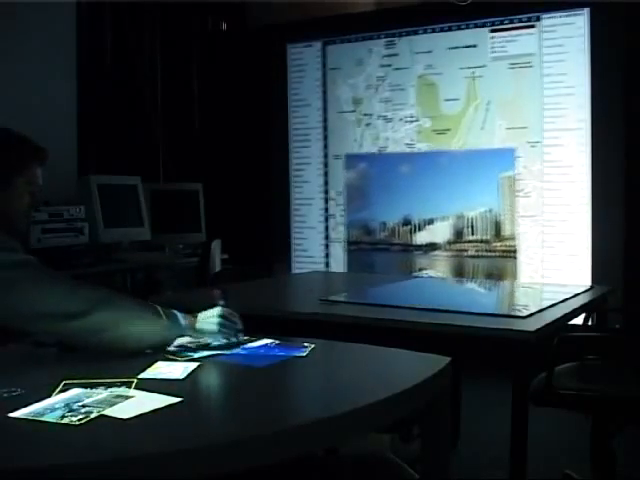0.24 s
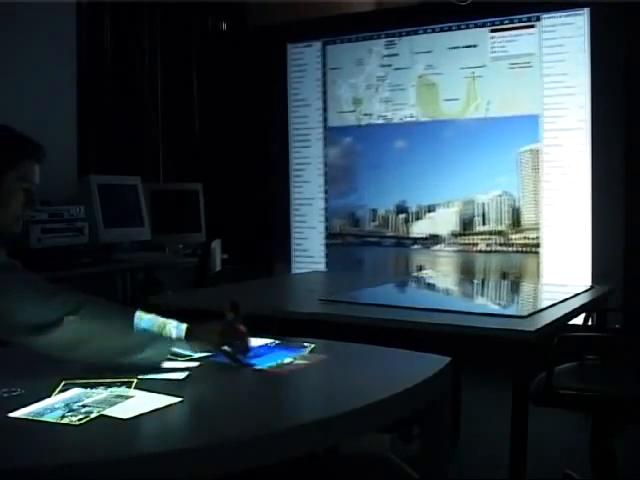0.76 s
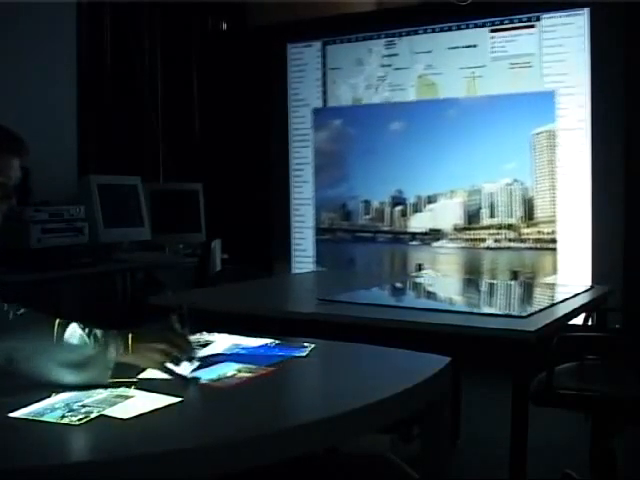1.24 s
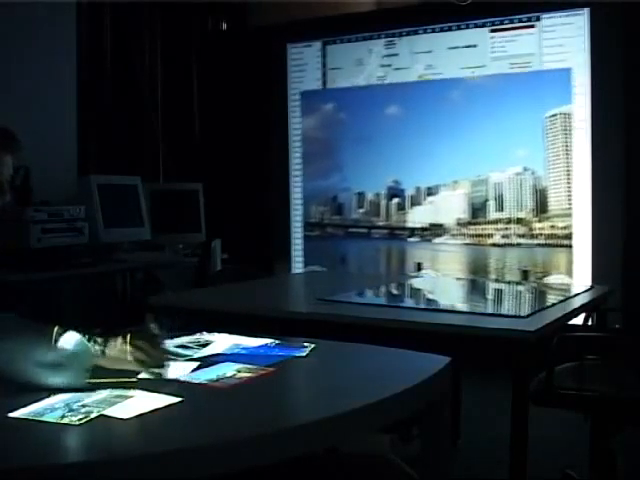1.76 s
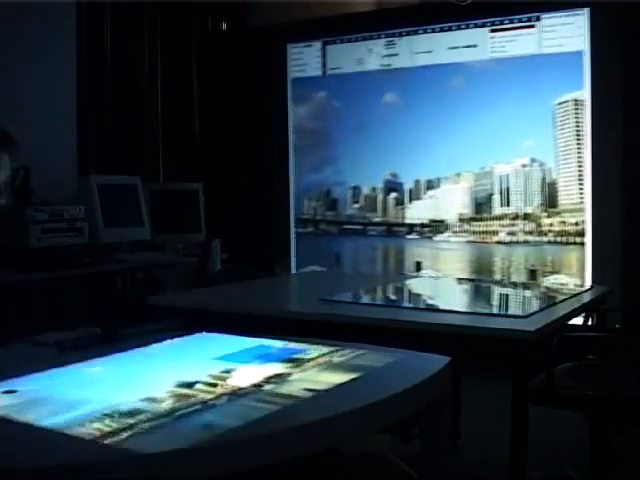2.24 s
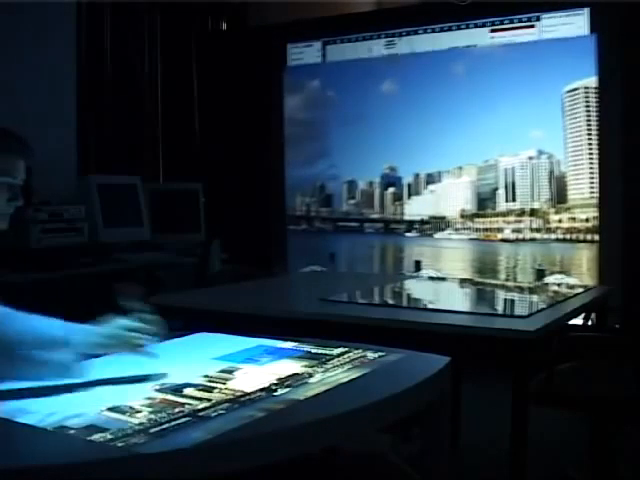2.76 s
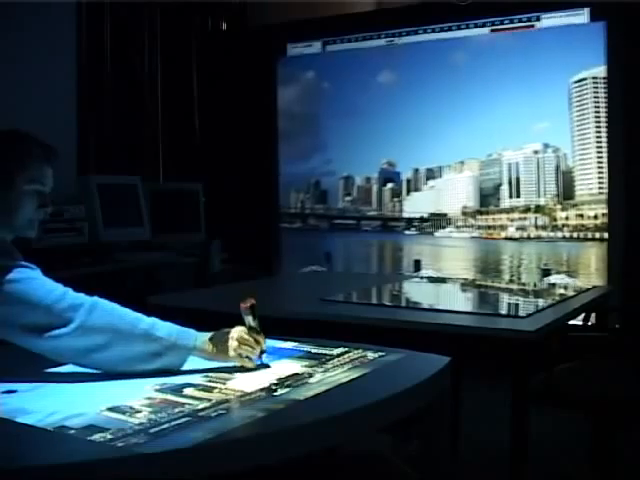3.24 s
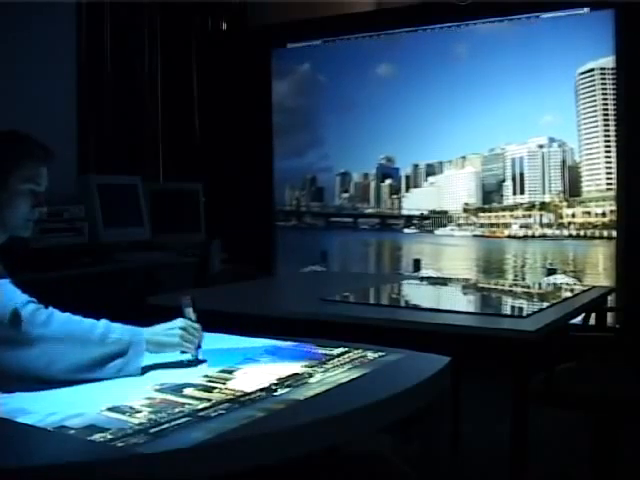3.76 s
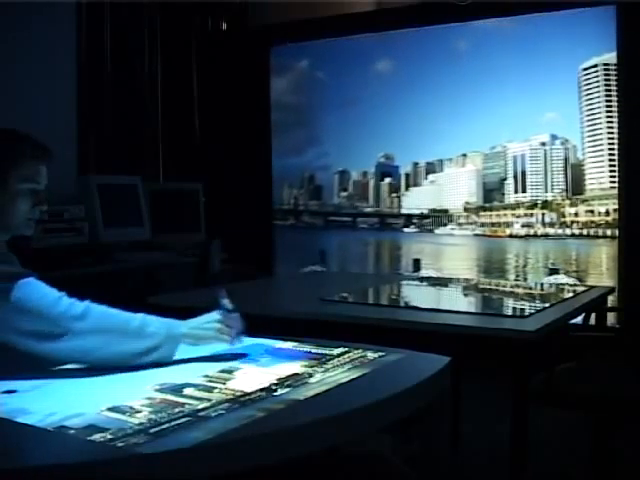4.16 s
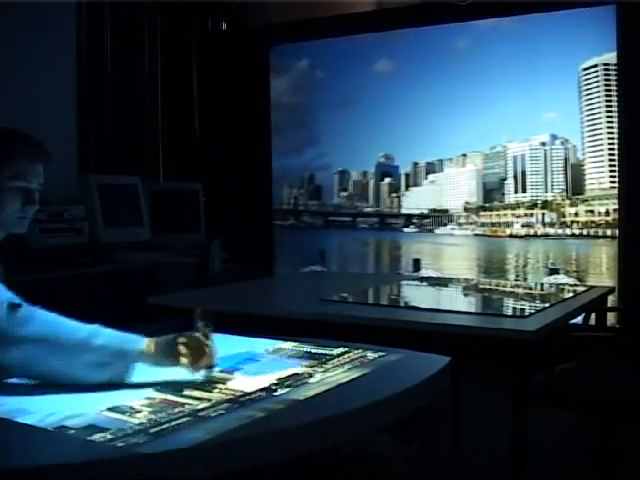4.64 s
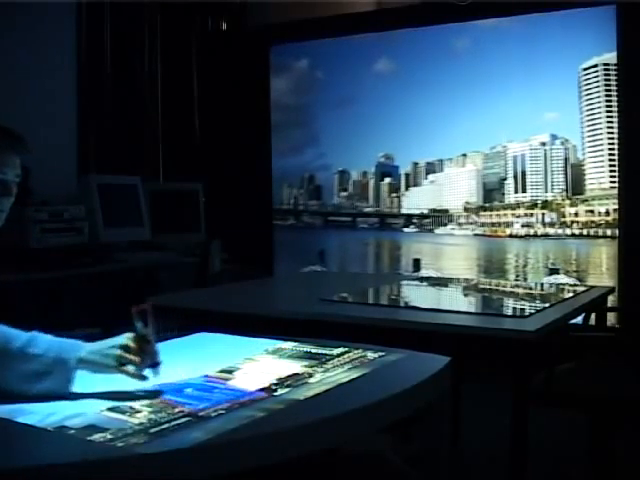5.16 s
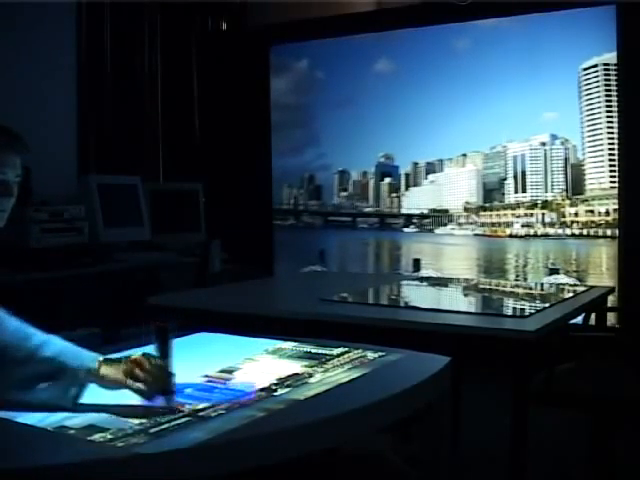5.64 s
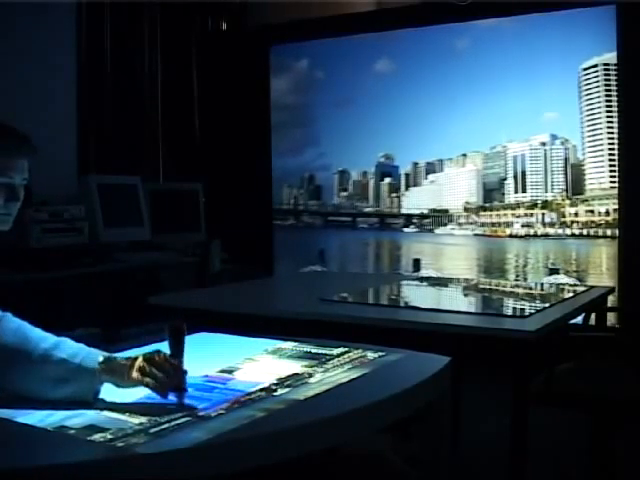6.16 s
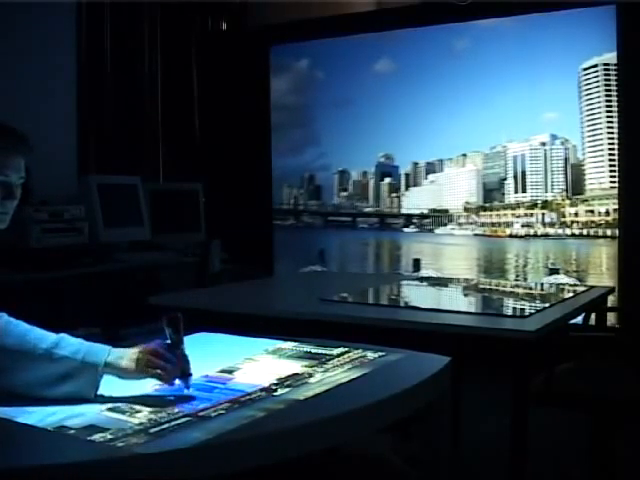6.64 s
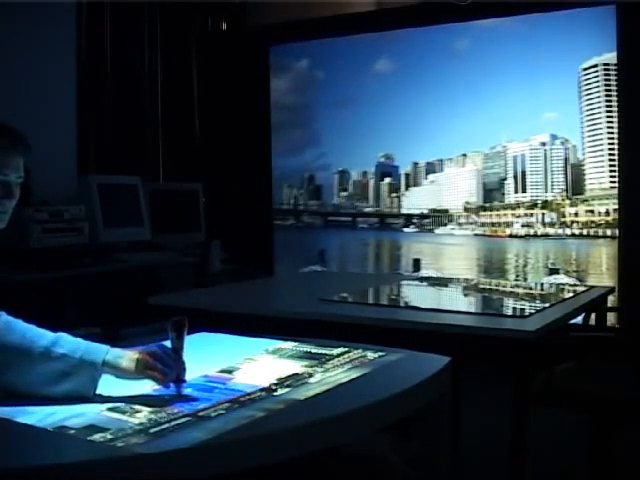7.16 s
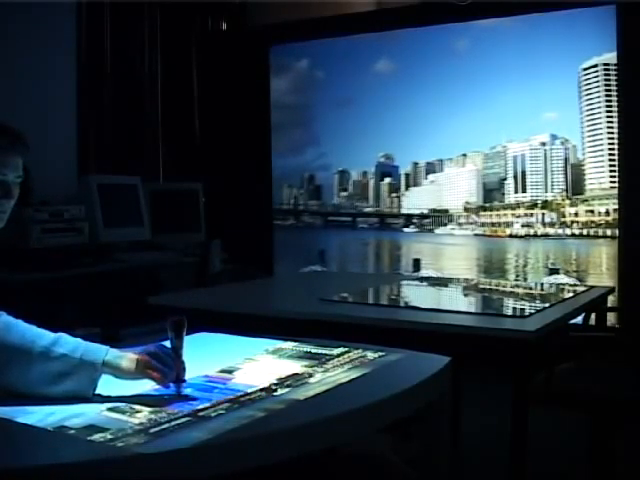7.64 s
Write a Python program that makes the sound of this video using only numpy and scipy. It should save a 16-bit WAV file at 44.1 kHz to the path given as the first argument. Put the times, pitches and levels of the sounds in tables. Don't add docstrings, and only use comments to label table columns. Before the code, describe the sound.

Spaced hollow pen clicks and soft sliding rubs on a solid table, in a live room filled with low fan drone and airy hiss.

```python
import sys
import numpy as np
from scipy import signal
from scipy.io import wavfile
from scipy.ndimage import uniform_filter1d

SR = 44100
rng = np.random.default_rng(int(sys.argv[2]) if len(sys.argv) > 2 else 0)


def decibels_to_gain(level_db):
    exponent = np.asarray(level_db, float) / 20
    return 10 ** exponent


def store_pcm(level_fs):
    pcm = np.round(np.clip(level_fs, -1, 1) * 32767).astype(np.int16)
    wavfile.write(sys.argv[1], SR, np.atleast_2d(pcm).T)


N = 347949


def tap(blow_db, hz, second_hz, second_db, knock_db, tilt_db, upper_db, tip_db, tick_db, thud_db):
    # (frequency [Hz], level [dB], t60 [s])
    slab_modes = [(113.3, 2.5, 0.59), (134.5, 4, 0.16), (199, -0.5, 0.59), (221, 1, 0.43)]
    knock_modes = [(352.3, -9.5, .2), (429, -11, 0.11), (482.5, -6.5, 0.099), (559.5, -6.5, 0.058),
                   (634.5, 4.5, 0.047), (810, 1.5, 0.023), (850, 0.5, 0.085), (989, 6, 0.028),
                   (1138, 1, 0.044)]
    # (factor on its pitch [1], level [dB], t60 [s])
    barrel_modes = [(.95, -3, .02), (1, -2.5, 0.031), (1.055, -8, .02)]
    # (frequency [Hz], level [dB], t60 [s])
    upper_modes = [(2100, 0, .02), (2350, -2, .02)]
    fizz_modes = [(3510, 1, 0.0019), (4320, 0.5, 0.003), (5050, -8.5, 0.0058), (6130, -8.5, 0.0024),
                  (8220, -17, 0.0035), (10060, -38, 0.0056)]
    # (factor on its pitch [1], level [dB], t60 [s])
    tick_modes = [(1, 0, .007)]
    # (factor on the mean barrel pitch [1], level [dB], t60 [s])
    contact_modes = [(1.02, 0, 0.0015)]

    body = ring(barrel_modes, scale=hz, rise_s=0.0003)
    body += decibels_to_gain(second_db) * ring(barrel_modes, scale=second_hz, rise_s=0.0003)
    tilted = [(f, db + tilt_db * np.log2(f / 650), t60) for f, db, t60 in knock_modes]
    body += decibels_to_gain(knock_db + 3.5) * ring(tilted, rise_s=0.002, spread_db=1)
    body *= decibels_to_gain(blow_db - 11)
    body -= decibels_to_gain(upper_db - 7) * ring(upper_modes, rise_s=0.0003, flip=-1)

    tip = decibels_to_gain(tip_db - 1) * ring(fizz_modes, rise_s=0.0001, flip=-1, spread_db=1.5)
    tip -= decibels_to_gain(tip_db + tick_db + 1) * ring(tick_modes, scale=2890, rise_s=0.0003)
    tip += decibels_to_gain(blow_db - 10.5) * ring(contact_modes, scale=(hz + second_hz) / 2, rise_s=0.0001)

    heard = room(body, wet_db=10, echo_db=0) + room(tip, wet_db=1, echo_db=-0.82)
    thud = decibels_to_gain(thud_db - 0.5) * ring(slab_modes, rise_s=0.011, spread_db=-0.5)
    heard[:, :len(thud)] += thud
    return heard


def nudge(blow_db, hz, knock_db):
    return tap(blow_db, hz, second_hz=1.26 * hz, second_db=-9, knock_db=knock_db, tilt_db=0,
               upper_db=blow_db - 10.5, tip_db=blow_db - 17.5, tick_db=0, thud_db=blow_db - 5)


def drag(length, friction_db, barrel_db, speeding):
    # (frequency [Hz], width [Hz], level [dB])
    tip_modes = [(3870, 1200, 1), (5260, 1500, -7.5), (6580, 1800, -10), (8300, 1000, -10)]
    shaken_modes = [(1455, 470, 10.5), (1880, 850, 6.5), (850, 1700, 2.5)]
    t = np.arange(0, length, 1 / SR)
    bent = (t / length) ** (np.log(0.5) / np.log(speeding))
    speed = np.sin(np.pi * bent)
    ringing = np.sin(np.pi * bent ** 1.5)

    caught = rng.random(len(t)) < 5000 / SR
    strength = decibels_to_gain(2.5 * np.minimum(rng.exponential(1, len(t)), 4))
    slips = rng.standard_normal(len(t)) * strength * caught

    grip = 1 + 0.04 * rng.uniform(-1, 1)
    tip = rubbed(slips, tip_modes, grip)
    barrel = rubbed(slips, shaken_modes, grip)

    squeal_hz = 2340 + (2650 - 2340) * speed
    turn = np.exp(2j * np.pi * np.cumsum(squeal_hz) / SR)
    smooth = signal.lfilter(*signal.butter(2, 380, fs=SR), slips / turn)
    squeal = evened((turn * smooth).real)

    rub = (tip + squeal * decibels_to_gain(1)) * abs(speed) ** 0.89
    rub += barrel * decibels_to_gain(barrel_db) * abs(ringing) ** 0.89
    rub *= decibels_to_gain(friction_db - 7)
    along = np.pi / 2 * t / length
    return room(rub * np.cos(along), 3, -24) + room(rub * np.sin(along), 3, -24)


def rubbed(slips, modes, grip):
    out = np.zeros(len(slips))
    for k, (hz, width, db) in enumerate(modes):
        out += (-1) ** k * decibels_to_gain(db) * resonate_twice(slips, hz * grip, width)
    return evened(out)


def ring(modes, scale=1, rise_s=0., spread_db=0., flip=1):
    t = np.arange(SR // 2) / SR
    luck = rng.standard_normal(len(modes))
    x = np.zeros(len(t))
    for k, (hz, db, t60) in enumerate(modes):
        decay = decibels_to_gain(db + spread_db * luck[k] - 60 * t / t60)
        x += flip ** k * decay * np.sin(2 * np.pi * hz * scale * t)
    x = -x * (1 - np.exp(-t / (rise_s + 1e-5)))
    return x / abs(x).max()


def room(x, wet_db, echo_db):
    # (delay [ms], level [dB])
    echoes = [(1.4, 6), (2.3, -17), (3.5, -4.5), (5.6, 4.5), (7.1, -18), (8.9, 3.5), (11, 2), (14, 1.5),
              (18, -8), (22, 0.5)]
    # (frequency [Hz], t60 [s])
    decay = [(100, 1), (260, 0.4), (700, 0.41), (1400, 0.54), (2500, 0.56), (5000, 0.85), (10000, 0.13)]
    # (frequency [Hz], level [dB])
    filling = [(300, 3.5), (1000, -2.5), (1500, -6.5), (2200, -9), (2900, -4.5), (4500, -8.5), (8000, -6)]
    size = 30000
    taps = np.zeros((2, size))
    at = np.arange(200, size - 20, 20) + rng.integers(0, 20, (2, (size - 201) // 20))
    np.put_along_axis(taps, at, rng.choice([-1., 1.], at.shape), 1)
    hz, t, z = signal.stft(taps, SR, nperseg=256)
    fade_db = read(filling, hz)[:, None] - 60 * t / read(decay, hz)[:, None]
    tail = signal.istft(paired(*z, hz) * decibels_to_gain(fade_db), SR, nperseg=256)[1]
    tail[:, :200] = 0
    response = decibels_to_gain(wet_db) * tail / np.sqrt((tail ** 2).sum(1).mean())
    response[:, 0] = 1
    for ms, db in echoes:
        start = round(ms * SR / 1000)
        skew = round(rng.uniform(-0.57, 1.0) * ms)
        blur = np.exp(-np.arange(40) / (0.3 + 0.3 * ms))
        for channel, begin in enumerate((start + skew, start)):
            response[channel, begin:begin + len(blur)] += decibels_to_gain(db + echo_db) * blur / blur.sum()
    return signal.fftconvolve(x[None], response, axes=1)


def drone():
    # (start [s], length [s], pitch [Hz], level [dB])
    duct_swells = [(0.0, 0.18, 75.1, -39.5), (0.138, .23, 73, -36), (.35, 0.27, 75.92, -44.5),
                   (.63, .5, 77.1, -45), (1.22, 0.36, 77.19, -44.5), (1.7, 0.38, 74.15, -43.5),
                   (2.1, 0.53, 72.06, -44), (2.58, 0.16, 70.34, -40), (2.79, 0.23, 72.17, -41.5),
                   (3.01, 0.21, 71.66, -41), (3.18, 0.95, 66.45, -40.5), (4.09, .21, 66.47, -39),
                   (4.33, 0.44, 60.48, -44.5), (4.78, .36, 68.67, -38), (5.14, 0.11, 70.85, -40.5),
                   (5.38, 0.32, 73, -42.5), (5.74, 0.42, 75.57, -42), (6.2, 0.22, 75.75, -45),
                   (6.56, 0.23, 74.57, -40.5), (6.81, 0.18, 72.7, -39), (7.01, 0.14, 77.73, -42.5),
                   (7.13, 0.23, 73.44, -37.5), (7.38, 0.44, 70.5, -31.5), (7.8, 0.23, 70.8, -29.5)]
    # (multiple [1], level [dB])
    overtones = [(3, -23), (4, -26)]
    # (start [s], length [s], level [dB])
    octave_swells = [
        (7.11, 0.3, -45),
        (7.5, .5, -52),
    ]
    start, length, hz, _ = np.transpose(duct_swells)
    pitch = np.interp(np.arange(N) / SR, start + length / 2, hz)
    turns = 2 * np.pi * np.cumsum(pitch) / SR
    lag = np.array([[0], [0.35]])
    tone = np.sin(turns + lag)
    for k, db in overtones:
        tone += decibels_to_gain(db) * np.sin(k * turns + lag + 6 * rng.random())
    octave = np.sin(2 * turns + lag) * swells(octave_swells)
    lull = decibels_to_gain(-69.5)
    return np.sqrt(2) * (tone * (swells(duct_swells) + lull) + octave) * decibels_to_gain(np.array([[-1.5], [1.5]]))


def swells(rows):
    edge_s, growth_db = 0.072, 2.5
    t = np.linspace(0, N / SR, num=4000)
    out = np.zeros(len(t))
    for start, length, *_, db in rows:
        inside = np.minimum(t - start, start + length - t)
        edge = np.clip(inside / min(edge_s, length / 2), 0, 1)
        growth = growth_db * np.clip((t - start) / length - 0.5, -1, 1)
        out += np.sin(np.pi / 2 * edge) ** 2 * decibels_to_gain(db + growth)
    return np.interp(np.arange(N) / SR, t, out)


def whines():
    # (frequency [Hz], width [Hz], level [dB])
    fan_tones = [(51.85, 9.4, -49.5), (121.2, 1.2, -58), (151.7, 13, -55.5), (202, 25, -57.5),
                 (287.8, 23, -65), (368, 11, -63.5), (483.6, 8.1, -65.5), (798, 19, -62), (1202, 36, -62),
                 (8340, 330, -89)]
    out = np.zeros((2, N))
    for hz, width, db in fan_tones:
        mid, side = resonate_twice(rng.standard_normal((2, N)), hz, width)
        out += decibels_to_gain(db) * np.array([mid + 0.46 * side, mid - 0.1 * side]) / mid.std()
    return out


def air():
    # (frequency [Hz], level [dB per Hz])
    rumble = [(12, -38), (20, -19), (71, -1.5), (97, -10.5), (160, -15), (179, -15), (350, -14.5),
              (377, -12.5), (406, -19.5), (480, -16.5), (779, -18), (1700, -24.5), (2210, -75),
              (3740, -120)]
    hiss = [(880, -11), (1500, -40.5), (1770, 0.5), (2030, -4), (2590, -3.5), (3140, -8.5), (4430, -10.5),
            (5020, -12), (8380, -19.5), (11200, -20.5), (14500, -35), (22000, -120)]
    frames, hz = N // 512 + 5, np.fft.rfftfreq(2048, 1 / SR)
    a, b, c, d, patches = rng.standard_normal((frames, 1025, 5)).T
    patches = evened(uniform_filter1d(uniform_filter1d(patches, 20, 0), 8, 1))
    colour = np.hypot(decibels_to_gain(read(rumble, hz)), decibels_to_gain(read(hiss, hz) - 25))
    z = paired(a + 1j * b, c + 1j * d, hz) * colour[:, None] * decibels_to_gain(1.3 * patches)
    x = signal.istft(z, nperseg=2048, noverlap=1536)[1][:, :N]
    return decibels_to_gain(-44.5) * evened(x)


def paired(a, b, hz):
    # (frequency [Hz], likeness [1])
    likeness = [(60, 0.43), (130, 0.9), (260, 0.78), (550, 0.72), (1160, 0.65), (2430, 0.037),
                (5100, 0.056), (10700, 0.82)]
    same = np.clip(read(likeness, hz), -1, 1)[:, None]
    mid, side = np.sqrt((1 + same) / 2) * a, np.sqrt((1 - same) / 2) * b
    return np.array([mid + side, mid - side])


def resonate_twice(x, hz, width):
    r = np.exp(-np.pi * width / SR)
    b, a = [1 - r, 0, r - 1], [1, -2 * r * np.cos(2 * np.pi * hz / SR), r * r]
    return signal.lfilter(b, a, signal.lfilter(b, a, x))


def evened(x):
    return x / np.sqrt(np.mean(x ** 2) + 1e-20)


def read(points, hz):
    f, value = np.transpose(points)
    return np.interp(np.log(hz + 1), np.log(f + 1), value)


def add(mix, s, sound):
    part = mix[:, round(s * SR):][:, :sound.shape[1]]
    part += sound[:, :part.shape[1]]


def scene():
    # (time [s], blow [dB], barrel pitch [Hz], second barrel pitch [Hz], its level re blow [dB])
    blows = [
        (0.053, -13.5, 1320, 1520, -8),
        (1.6309, -9, 1294, 1607, -3),
        (3.281, -7.5, 1438, 1563, -5),
        (4.3343, -8, 1396, 1624, 3),
        (5.332, -4, 1410, 1590, -18.5),
        (6.7580, -7, 1340, 1508, -5.5),
    ]
    # (table knock re blow [dB], its tilt [dB per octave], upper barrel [dB], tip [dB],
    # tick re tip [dB])
    landings = [
        (-17, -6.5, -23.5, -27.5, 0),
        (-22, 0, -48.5, -29.5, -2),
        (-11.5, 2.5, -18.5, -21, 0),
        (-9.5, 2, -36, -22, -4),
        (-12.5, 4, -19, -19, -6.5),
        (-14.5, 0, -20, -25.5, -3.5),
    ]
    # (time [s], blow [dB], barrel pitch [Hz], table knock [dB])
    shifts = [
        (0.463, -38, 1040, 0.5),
        (0.486, -46, 850, 2.5),
        (0.512, -44.5, 1140, -4),
        (2.355, -41.5, 1740, -10),
    ]
    # (start [s], length [s], friction [dB], barrel ring re friction [dB], share speeding up [1])
    strokes = [
        (0.196, .43, -55.5, 2, .42),
        (0.719, 0.44, -55.5, -5, 0.36),
        (1.734, 0.51, -53, 4, 0.26),
        (1.919, 0.49, -55.5, 11.5, 0.23),
        (3.442, 0.59, -52.5, 2, 0.44),
        (3.795, 0.19, -56.5, 12, 0.55),
        (4.413, .44, -51.5, 1, 0.39),
        (5.44, 0.43, -56.5, 3.5, 0.17),
    ]
    mix = air() + whines() + drone()
    for start, *stroke in strokes:
        add(mix, start, drag(*stroke))
    for (s, *blow), landing in zip(blows, landings):
        add(mix, s + 0.00023, tap(*blow, *landing, thud_db=-24.5))
    for s, *shift in shifts:
        add(mix, s, nudge(*shift))
    return mix


def starved(x):
    # (frequency [Hz], level [dB])
    gate = [(3000, -22), (5000, -9), (6300, 0), (7600, 4.5), (9000, 7), (10500, 8.5)]
    # (frequency [Hz], level [dB])
    side_gate = [(4000, 1.5), (6000, 3), (8000, -3), (10500, -7.5)]
    size = 576
    n, k = np.arange(2 * size), np.arange(size)
    window = np.sin(np.pi * (n + 0.5) / (2 * size))[:, None]
    basis = np.sqrt(2 / size) * window * np.cos(np.pi / size * np.outer(n + 0.5 + size / 2, k + 0.5))
    count = N // size + 2
    mid_side = [x[0] + x[1], x[0] - x[1]]
    halves = np.pad(mid_side, ((0, 0), (size, (count + 1) * size - N - size))).reshape(2, -1, size)
    bins = np.concatenate([halves[:, :-1], halves[:, 1:]], 2) @ basis

    hz = k * SR / (2 * size)
    loud_db = 10 * np.log10((bins[0][:, (hz > 1400) & (hz < 7000)] ** 2).mean(1))
    widening_db = np.minimum(0.85 * (loud_db - np.median(loud_db)), 4.0)[:, None]
    flicker = np.repeat(rng.standard_normal((count, size // 8)), 8, 1)
    flicker += 0.4 * rng.standard_normal((count, 1))
    usual = np.sqrt(uniform_filter1d(np.median(bins[0] ** 2, 0), 32) / 0.455)
    limit = usual * decibels_to_gain(read(gate, hz) + widening_db + 2.5 * flicker)
    step = 2 * limit * decibels_to_gain(np.array([0 * hz, read(side_gate, hz)]))[:, None]

    frames = np.where(hz < 3000, bins, step * np.round(bins / step)) @ basis.T
    first = np.pad(frames[..., :size], ((0, 0), (0, 1), (0, 0)))
    second = np.pad(frames[..., size:], ((0, 0), (1, 0), (0, 0)))
    mid, side = (first + second).reshape(2, -1)[:, size:size + N] / 2
    return np.array([mid + side, mid - side])


def top_cut(x):
    return signal.sosfilt(signal.butter(12, 11280, fs=SR, output="sos"), x)


def record(dry):
    mix = starved(dry)
    return top_cut(mix)


dry = scene()
out = record(dry)
store_pcm(out)
```